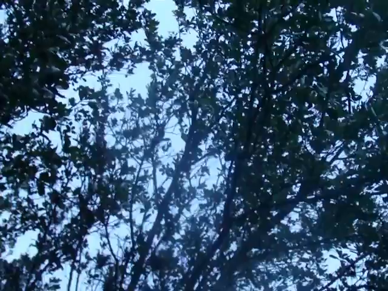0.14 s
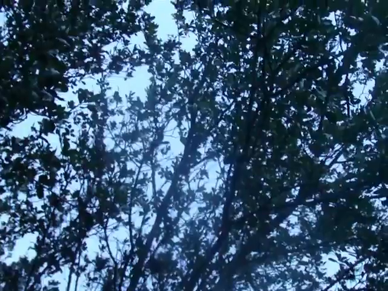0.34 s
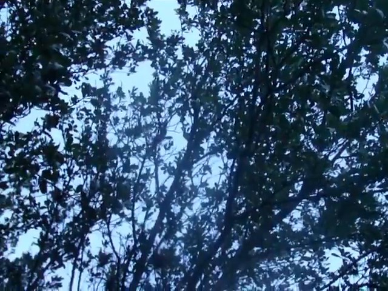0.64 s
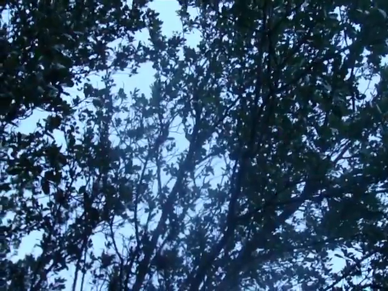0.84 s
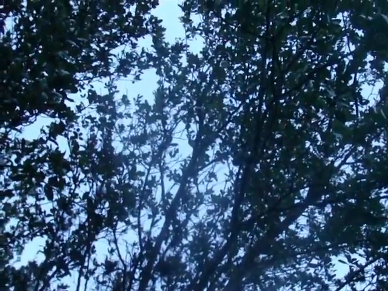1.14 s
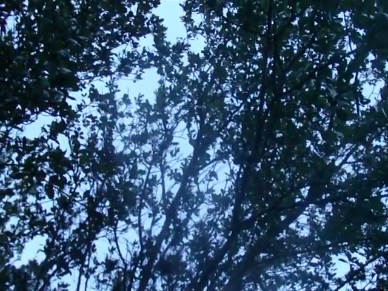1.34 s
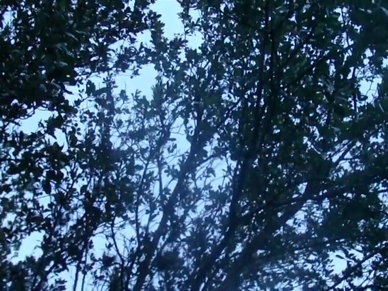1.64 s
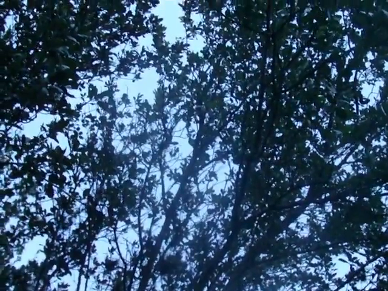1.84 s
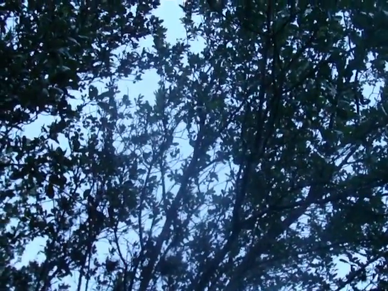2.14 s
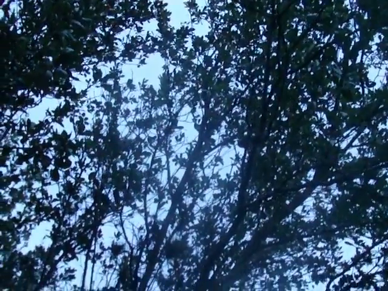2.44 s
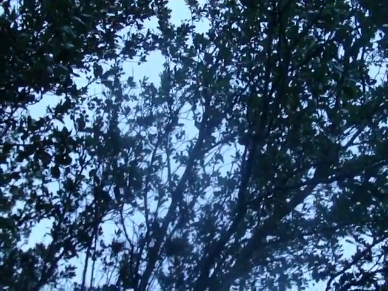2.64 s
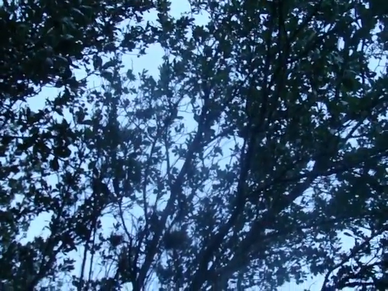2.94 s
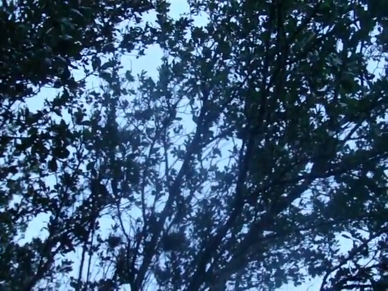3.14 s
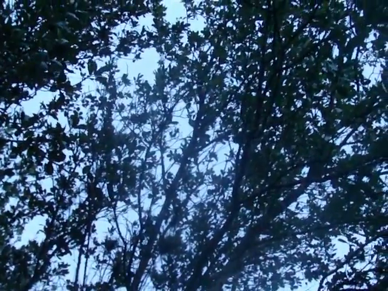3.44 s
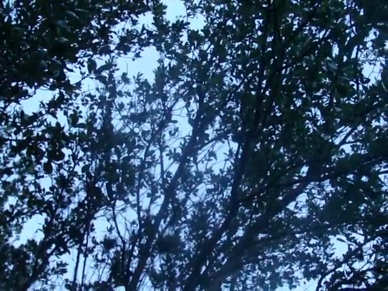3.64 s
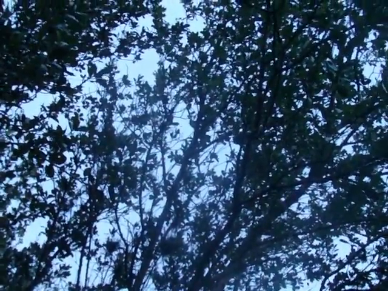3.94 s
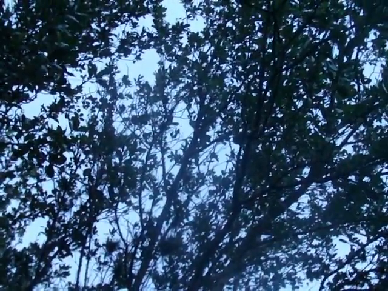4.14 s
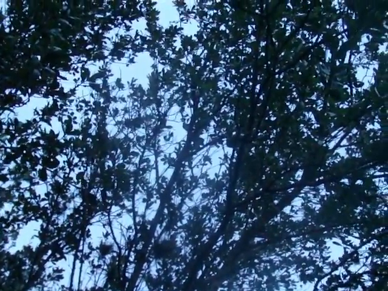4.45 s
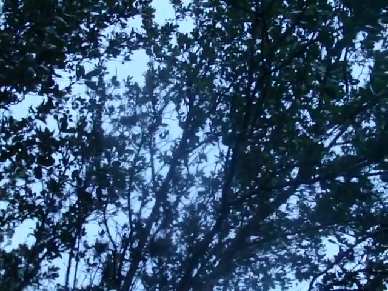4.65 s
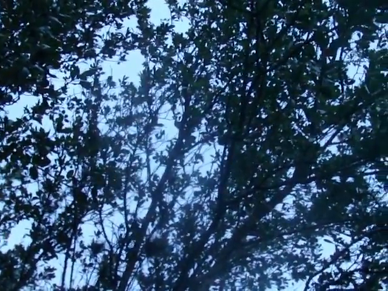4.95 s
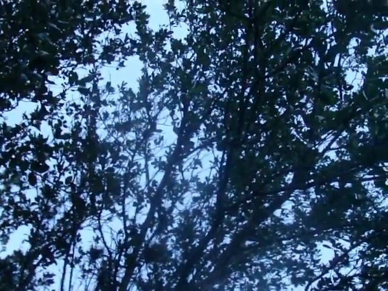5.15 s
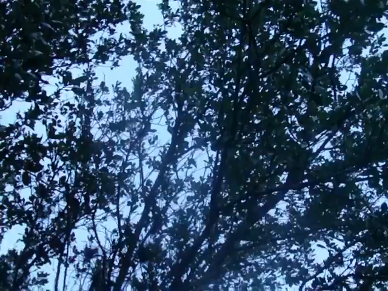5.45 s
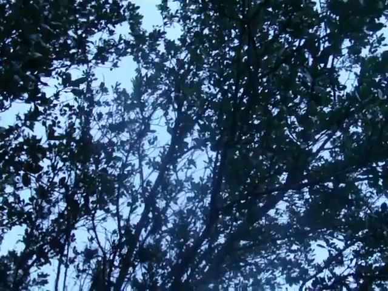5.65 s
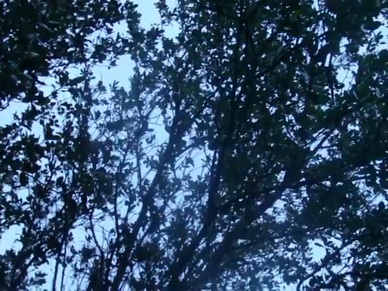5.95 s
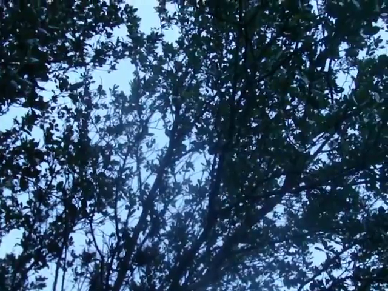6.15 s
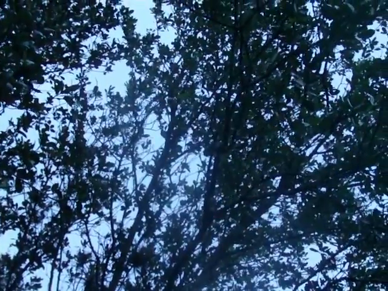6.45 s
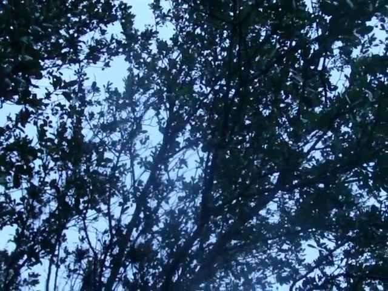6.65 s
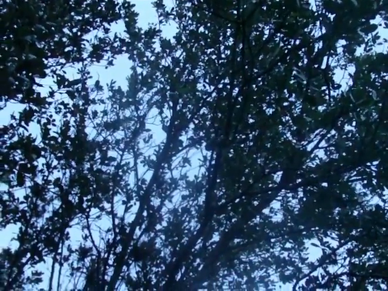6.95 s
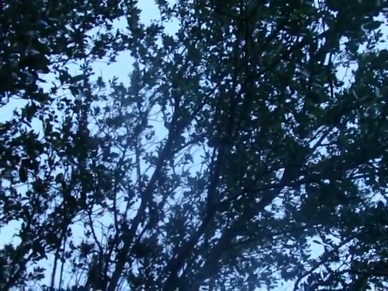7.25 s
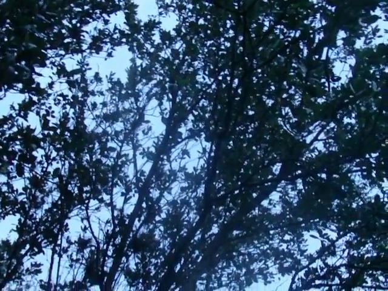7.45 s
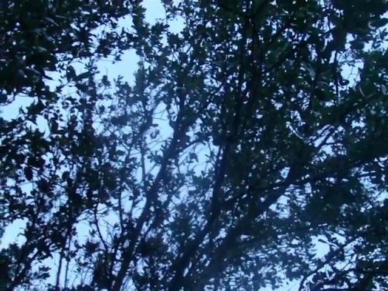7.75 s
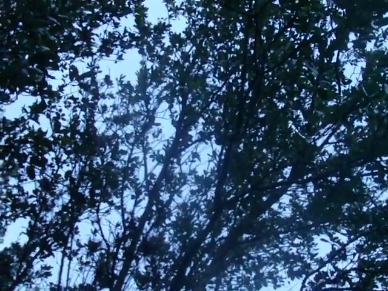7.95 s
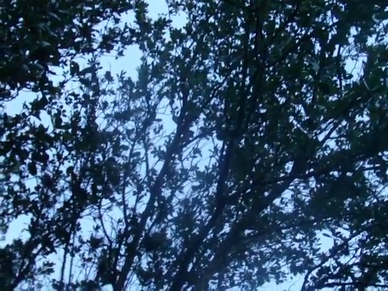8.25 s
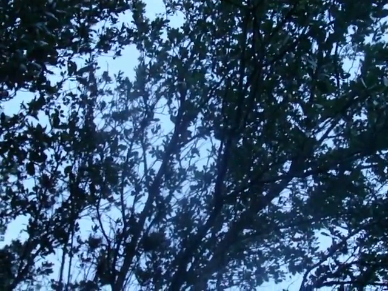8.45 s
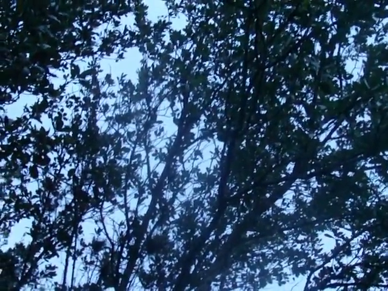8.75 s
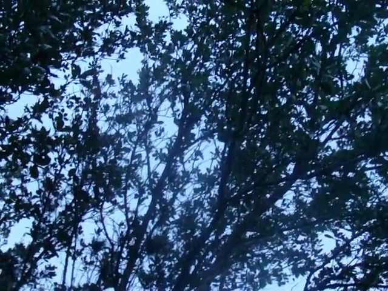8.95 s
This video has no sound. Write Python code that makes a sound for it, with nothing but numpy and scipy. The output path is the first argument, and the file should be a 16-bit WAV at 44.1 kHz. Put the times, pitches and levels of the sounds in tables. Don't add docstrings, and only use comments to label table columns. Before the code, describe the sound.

Harsh, high cicada buzzing flutters steadily overhead while smaller insects sizzle above it and distant traffic swells and fades behind.

```python
import sys
import numpy as np
from scipy import signal
from scipy.fft import rfft, irfft, next_fast_len
from scipy.io import wavfile
from scipy.ndimage import uniform_filter1d

SR = 44100
rng = np.random.default_rng(int(sys.argv[2]) if len(sys.argv) > 2 else 0)


def level_to_linear(level):
    exponent = np.asarray(level, float) / 20
    return 10 ** exponent


def output_pcm(signal):
    pcm = np.clip(np.atleast_2d(signal).T, -1, 1) * 32767
    wavfile.write(sys.argv[1], SR, np.round(pcm).astype(np.int16))


N = 401310
T = np.arange(N) / SR


def level(x, db):
    return x * level_to_linear(db) / np.sqrt(np.mean(x ** 2))


def coloured(points):
    size = next_fast_len(N)
    hz, db = np.transpose(points)
    bins_hz = np.arange(size // 2 + 1) * SR / size
    shape_db = np.interp(np.log(bins_hz + 1), np.log(hz), db, left=-90, right=-90)
    spectrum = rfft(rng.standard_normal(size)) * level_to_linear(shape_db)
    return level(irfft(spectrum, size)[:N], 0)


def walk(rate_hz):
    hold = int(SR / rate_hz)
    steps = np.repeat(rng.standard_normal(N // hold + 1), hold)
    return uniform_filter1d(uniform_filter1d(steps, hold), hold)[:N]


def bell(at_s, db, width_s):
    return level_to_linear(db) * np.exp(-.5 * ((T - at_s) / width_s) ** 2)


def rings(starts, sizes, detune, turn, rib):
    delay_ms, from_hz, to_hz, rise_ms, fall_ms, db = rib
    span_ms = rise_ms + fall_ms
    size = int(span_ms * SR / 1000) + 2
    at = (starts + delay_ms / 1000) * SR
    index = np.floor(at).astype(int)[:, None] + np.arange(1, size)
    ms = (index - at[:, None]) / SR * 1000
    cycles = (from_hz * ms + (to_hz - from_hz) * ms ** 2 / span_ms / 2) / 1000
    ramp = np.clip(np.minimum(ms / rise_ms, (span_ms - ms) / fall_ms), 0, 1)
    swell = np.sin(np.pi / 2 * ramp) ** 2
    tone = np.sin(2 * np.pi * (cycles * detune[:, None] + turn[:, None]))
    wave = (sizes * level_to_linear(db))[:, None] * swell * tone
    heard = (index >= 0) & (index < N)
    return np.bincount(index[heard], wave[heard], N)


# (frequency [Hz], level [dB per Hz])
FAR_ROAD_SPECTRUM = [(280, -12), (480, -9.5), (713, -6.5), (808, -4.5), (928, -1), (1360, -3), (1800, -4.5),
                     (2150, -1), (2800, -18), (4730, -120)]


def far_road():
    return level_to_linear(-46 + 1.2 * walk(1.5)) * coloured(FAR_ROAD_SPECTRUM)


SPEED_M_S, CLOSEST_S, DISTANCE_M = 29, 5.7, 41


def passing():
    along_m = SPEED_M_S * (CLOSEST_S - T)
    away_m = np.hypot(along_m, DISTANCE_M)
    return DISTANCE_M / away_m, along_m / away_m


# (frequency [Hz], level [dB per Hz])
RUMBLE_SPECTRUM = [(12, -39), (20, -4.5), (43, -5), (86, -3), (104, -6.5), (135, -9), (185, -8.5),
                   (350, -17.5), (520, -27), (680, -57), (1140, -120)]


def rumble():
    near, _ = passing()
    gain = np.hypot(level_to_linear(-46) * near, level_to_linear(-57))
    return gain * level_to_linear(10.5 + 1.6 * walk(3.23)) * coloured(RUMBLE_SPECTRUM)


# (closest [s], tyre level [dB], half width [s])
CAR_PASSES = [
    (2.95, -43.5, 0.56),
    (5., -43.5, 0.27),
    (8.5, -42.5, 0.35),
]
# (frequency [Hz], level [dB per Hz])
TYRE_SPECTRUM = [(350, -23), (500, -13.5), (720, -5), (850, -1), (1200, -2), (1550, -5), (1900, -10.5),
                 (2400, -35)]


def tyres():
    near, _ = passing()
    heavy = level_to_linear(-39) * near ** 1.5
    cars = sum(bell(*car) ** 2 for car in CAR_PASSES)
    return np.sqrt(heavy ** 2 + cars) * level_to_linear(0.41 * walk(3.7)) * coloured(TYRE_SPECTRUM)


FIRING_HZ, FIRING_DB = 83, -34
# (multiple of the cycle, loudest [s], level [dB], half width [s])
HEDGE_GAPS = [(5, 0., -49, .4), (5, 3, -44, 0.87), (5, 5.5, -35, 1.15), (5, 9., -45, 0.55),
              (8, 9.5, -43, 1), (8, 1.6, -46.5, 1.8), (16, 1.5, -49.5, 1.4), (16, 3.5, -41, 0.86),
              (16, 5.5, -43, 1.12), (16, 8.5, -36.5, 1.12), (24, 3.5, -53, 1.5), (24, 6, -44, 0.82)]
# (multiple of the cycle, level against the firing line [dB])
WEAK_ORDERS = [(6, -13), (9, -20), (11, -14), (13, -14), (14, -20), (18, -21.5), (19, -13)]


def engine():
    near, towards = passing()
    doppler = 1 + SPEED_M_S * towards / 343
    cycle = np.cumsum(FIRING_HZ * doppler / 8) / SR
    gains = {k: sum(bell(*row) for order, *row in HEDGE_GAPS if order == k) for k in (5, 8, 16, 24)}
    gains[8] = gains[8] + level_to_linear(FIRING_DB) * near
    gains.update({k: gains[8] * level_to_linear(db) for k, db in WEAK_ORDERS})
    gains[32] = bell(7.56, -52, 0.77)
    out = 0
    for k, gain in gains.items():
        waver = level_to_linear(0.99 * walk(2.4))
        line = np.sin(2 * np.pi * (k * cycle + rng.random()))
        out = out + np.sqrt(2) * gain * waver * line
    return out


# (from [s], to [s], frequency [Hz], level [dB])
SQUEAK_LINES = [
    (2.168, 2.245, 11650, -34),
    (2.17, 2.26, 12010, -41),
]


def squeak():
    out = 0
    for start, end, hz, db in SQUEAK_LINES:
        fade = np.clip(np.minimum(T - start, end - T) / .008, 0, 1)
        out = out + level_to_linear(db) * fade * np.sin(2 * np.pi * hz * T)
    return out


def shyness():
    join_s, join_span_s = 2.37, 0.43
    return 1 / (1 + np.exp((T - join_s) / join_span_s * 2))


# (frequency [Hz], level [dB per Hz])
HISS_SPECTRUM = [(5500, -1), (6500, -7.5), (8000, -1), (11000, -2.5), (13400, -.5), (14200, -9),
                 (15200, -17), (16000, -40)]


def leaf_hiss():
    return level_to_linear(-30 - 2.5 * shyness()) * coloured(HISS_SPECTRUM)


# (frequency [Hz], level [dB per Hz])
CHORUS_SPECTRUM = [(3760, -21), (6400, -15.5), (6640, -12), (7400, -12), (8200, -1), (8960, 2),
                   (9470, -1.5), (10300, -11.5), (11500, -19), (15000, -50), (22000, -120)]
# (from [s], to [s], click rate [per s], frequency [Hz], level [dB])
NEAR_SINGERS = [
    (2.65, 3.3, 338.6, 8350, 1),
    (2.4, 3.9, 306, 9200, -2),
    (3.3, 4.4, 320, 8300, -2),
    (4.0, 6.2, 340, 9200, -2),
    (5.6, 8.6, 320, 9000, -4),
    (3.0, 8.0, 335, 12800, -17),
    (3.7, 4.9, 327, 8800, -1),
    (2.0, 7.5, 352.7, 7055, -16),
]


def chorus():
    out = level_to_linear(0.85 * walk(9)) * coloured(CHORUS_SPECTRUM)
    for start, end, rate_hz, hz, db in NEAR_SINGERS:
        slowing = .004 * (T - (start + end) / 2) / (end - start)
        cycles = np.cumsum(rate_hz * (1 + .0016 * walk(2.5) - slowing)) / SR
        clicks = np.interp(np.arange(1, int(cycles[-1])), cycles, T)
        clicks = clicks[(clicks > start) & (clicks < end)]
        waver = level_to_linear(walk(5.3)[(clicks * SR).astype(int)])
        swell = np.sin(np.pi * (clicks - start) / (end - start)) * waver
        click = (0, hz, hz, .6, 1.5, db - 3)
        out = out + 2 * rings(clicks, swell, np.ones(len(clicks)), 0 * clicks, click)
    return level_to_linear(-22.5 - 2 * shyness()) * level(out, 0)


# (from [s], length [ms])
EARLY_RESTS = [(.1058, 6.1), (.2465, 11.2), (.3977, 9.9), (.5496, 7.6), (.7072, 6.9), (.8632, 9.4),
               (1.0122, 12.4), (1.1748, 7.4), (1.3333, 7.4), (1.4891, 7.9), (1.6471, 7.8), (1.7945, 10.6),
               (1.9489, 8.8), (2.1075, 7.6), (2.2655, 8.2), (2.4144, 8), (2.573, 9.1), (2.7333, 7.7),
               (2.8909, 11.1), (3.0526, 7), (3.2101, 7), (3.3667, 10.4), (3.5267, 8.2), (3.6858, 6.6),
               (3.8427, 8.8), (4.0025, 6.3), (4.1605, 9), (4.3287, 5.9), (4.4875, 8)]
# (from [s], length [ms])
LATE_RESTS = [(4.6345, 10.9), (4.7957, 8.6), (4.9627, 10.1), (5.1266, 10.6), (5.2962, 8.2), (5.4559, 10.9),
              (5.6206, 10.4), (5.7842, 12.1), (5.9489, 12.1), (6.112, 8.5), (6.2695, 12), (6.4312, 7.3),
              (6.5877, 7.2), (6.7472, 10.5), (6.9167, 6.9), (7.0763, 11.7), (7.2482, 7.2), (7.421, 8.7),
              (7.5871, 11.2), (7.7572, 9.7), (7.9207, 9.8), (8.0847, 10), (8.2549, 6.1), (8.4199, 6.7),
              (8.5898, 8.8), (8.7532, 8.2), (8.9101, 11.4), (9.074, 10)]


def phrases():
    rest_s, rest_ms = np.transpose(EARLY_RESTS + LATE_RESTS)
    return np.append(-.0447, rest_s + rest_ms / 1000), np.append(rest_s, 9.11)


def strokes():
    stroke_ms, scatter_ms, lead_ms = 4.575, .016, .28
    hasten, steady_at = .0035, 22
    start, end = np.array(phrases())[:, :, None]
    period_ms = stroke_ms + scatter_ms * rng.standard_normal(start.shape)
    k = np.arange(40)
    beats = np.cumsum(1 + hasten * (steady_at - k) * (k > 4)) - 1
    times = start + (period_ms * beats - lead_ms * (k % 2 == 0)) / 1000
    left_ms = (end - times) * 1000
    keep = left_ms > 2.2
    fade_db = -2.2 * np.maximum(4.5 - left_ms, 0)
    return times[keep], (k + 0 * times).astype(int)[keep], fade_db[keep]


# (frequency [Hz], swing per stroke [Hz], wander [Hz], level [dB])
BELLY_TONE = (3055, 29, 55, -15)
# (frequency [Hz], level [dB per Hz])
BELLY_RASP = [(2150, -29), (2480, -21.5), (2700, -13.5), (2900, -7), (3060, -8.5), (3130, -8.5),
              (3200, -9.5), (3450, -14.5), (3600, -22), (3800, -45)]


def belly(times):
    hz, swing_hz, wander_hz, db = BELLY_TONE
    fresh_hz, sag_hz_per_s = 40, 550
    beat = 2 * np.pi * np.interp(T, times, np.arange(len(times)))
    start, end = phrases()
    inside = np.searchsorted(start + .0016, T) > np.searchsorted(end - .0005, T)
    gate = uniform_filter1d(uniform_filter1d(1. * inside, 90), 90)
    shaken_hz = wander_hz * 1.65 * walk(190)
    shaken_hz = shaken_hz - .7 * uniform_filter1d(shaken_hz, SR // 45)
    since_start = T - start[np.searchsorted(start, T) - 1]
    hz = hz + fresh_hz - sag_hz_per_s * since_start
    phase = 2 * np.pi * np.cumsum(hz + swing_hz * np.cos(beat) + shaken_hz) / SR
    throb = level_to_linear(db - 1.3 * np.cos(beat + .6))
    tone = level_to_linear(0.93 * walk(60)) * np.sin(phase)
    return gate * throb * (tone + level_to_linear(-7.5) * coloured(BELLY_RASP))


# (frequency [Hz], level [dB per Hz])
FAR_KIN_SPECTRUM = [(2600, -40), (3050, -10), (3500, -16), (4150, 7), (5000, -2), (5800, -17), (6500, -25)]


def crown(x):
    t = np.arange(int(SR / 4)) / SR
    haze = rng.standard_normal(len(t)) * np.exp(-t / .014) * (1 - np.exp(-t / .0015))
    response = level_to_linear(-11) * haze / np.sqrt(np.sum(haze ** 2))
    response[0] += 1
    response[round(4.316 * SR / 1000)] += .14
    singer = level(signal.fftconvolve(x, response)[:N], 0)
    return level(singer + level_to_linear(-14) * coloured(FAR_KIN_SPECTRUM), 0)


# (delay [ms], start [Hz], end [Hz], rise [ms], fall [ms], level [dB])
TYMBAL_RIBS = [
    [(0, 4700, 5150, .7, 1.2, -1), (1.2, 4600, 3800, 1.4, 1.9, -2), (2.0, 3700, 3600, 1.8, 2.6, -15),
     (.2, 5900, 5900, 1.1, 2.0, -17)],
    [(.1, 5250, 4900, .5, 1.2, -.3), (.8, 4650, 3800, 1.4, 1.9, -.7), (2.0, 3700, 3600, 1.8, 2.6, -14),
     (.1, 5950, 5800, 1.0, 2.0, -15)],
]
RIB_LEVELS = [-0.17, -1.93, 1, 0.72]
# (frequency [Hz], width [Hz], level [dB])
PLATE_MODES = [
    (4064, 146, -6),
    (4790, 39, -8),
    (5113, 43, -11.5),
]


def cicada():
    times, place, fade_db = strokes()
    snaps = 0
    for side, ribs in enumerate(TYMBAL_RIBS):
        mine = place % 2 == side
        first = place[mine] == 0
        for rib, db in zip(ribs, RIB_LEVELS):
            slip, size, pitch, turn = rng.standard_normal((mine.sum(), 4)).T
            first_db = -12 if rib[0] < .5 else 1.5
            size_db = .9 * size + fade_db[mine] + db + first * first_db
            starts = times[mine] + .00006 * slip
            snaps = snaps + rings(starts, level_to_linear(size_db), 1 + .01 * pitch, 0.07 * turn, rib)
    plate = 0
    for hz, width_hz, db in PLATE_MODES:
        plate = plate + level_to_linear(db) * signal.lfilter(*signal.iirpeak(hz, hz / width_hz, SR), snaps)
    return snaps + plate + belly(times)


def scene():
    singer = level_to_linear(-14 + 0.0556 * T) * crown(cicada())
    leaves = chorus() + leaf_hiss() + squeak()
    road = tyres() + far_road() + rumble() + engine()
    return (singer + leaves + road)[None]


def band_limit(x):
    return signal.sosfilt(signal.butter(12, 15190, fs=SR, output="sos"), x)


def record(dry):
    mix = 1.499 * np.tanh(dry / 1.495) - .0015
    return band_limit(mix)


dry = scene()
out = record(dry)
output_pcm(out)
```